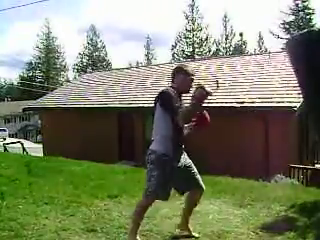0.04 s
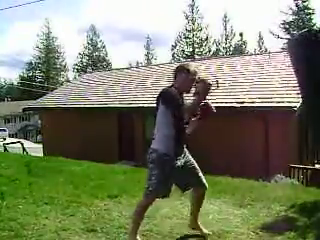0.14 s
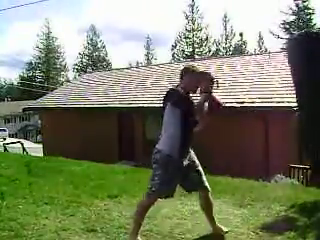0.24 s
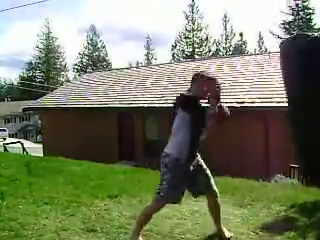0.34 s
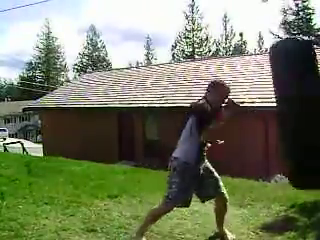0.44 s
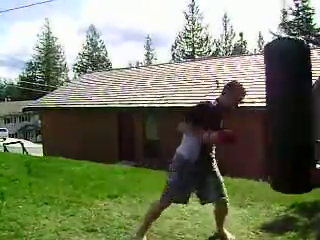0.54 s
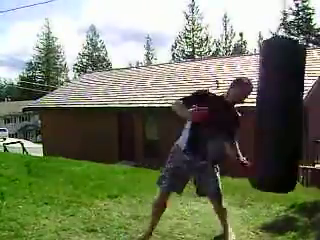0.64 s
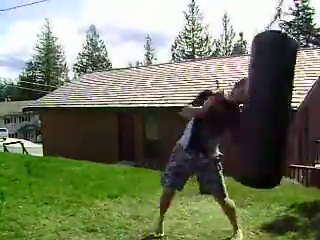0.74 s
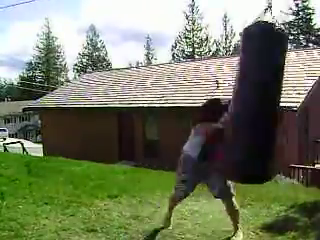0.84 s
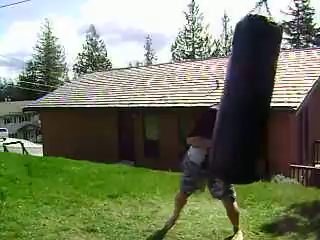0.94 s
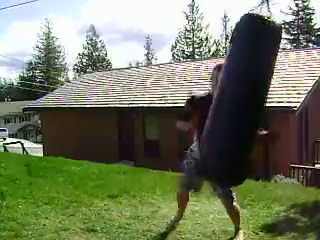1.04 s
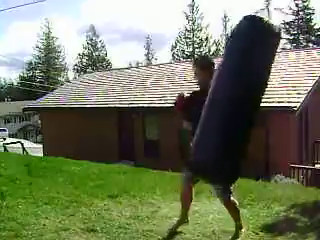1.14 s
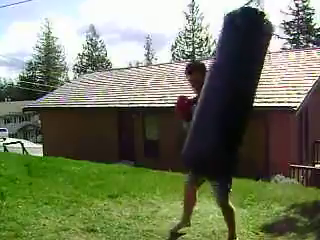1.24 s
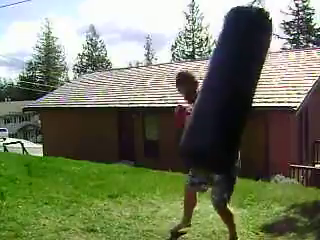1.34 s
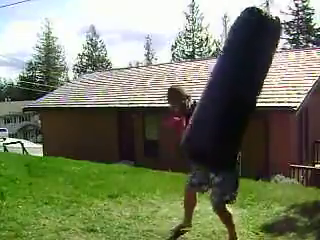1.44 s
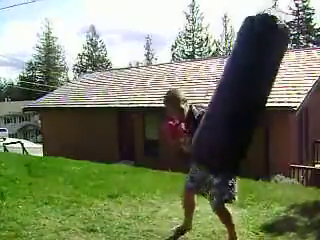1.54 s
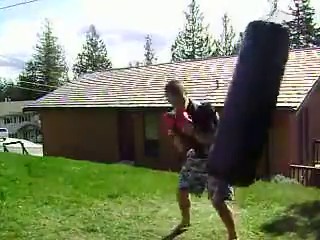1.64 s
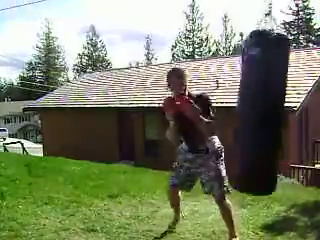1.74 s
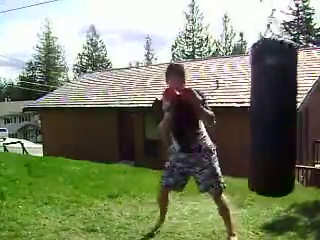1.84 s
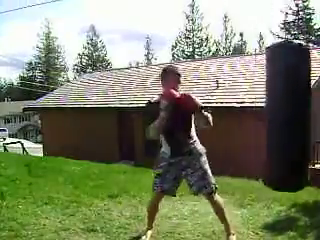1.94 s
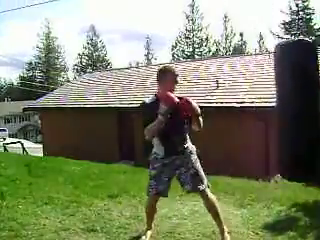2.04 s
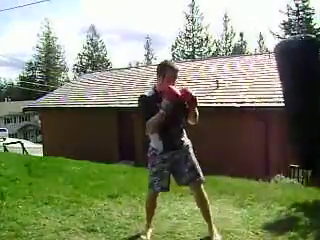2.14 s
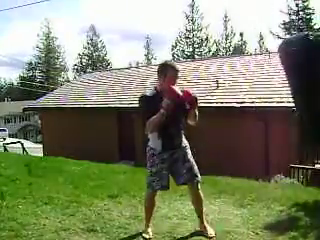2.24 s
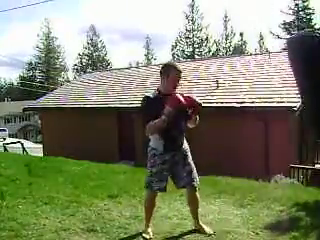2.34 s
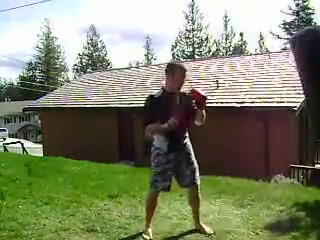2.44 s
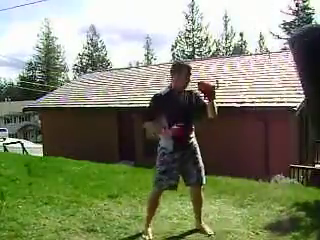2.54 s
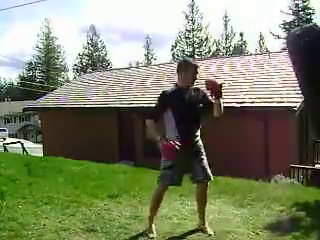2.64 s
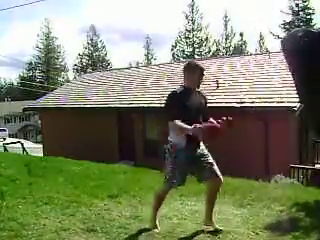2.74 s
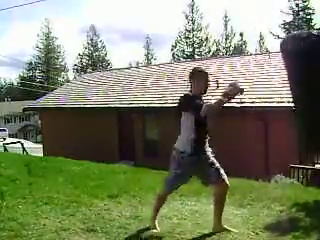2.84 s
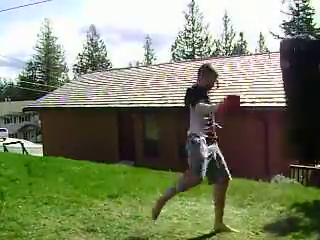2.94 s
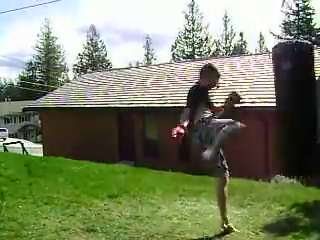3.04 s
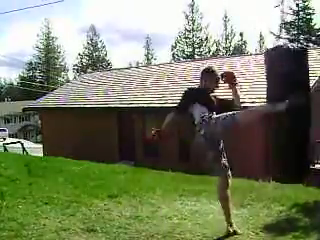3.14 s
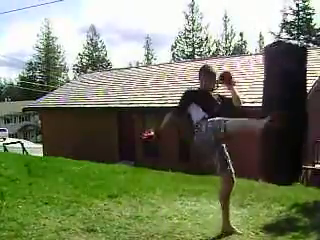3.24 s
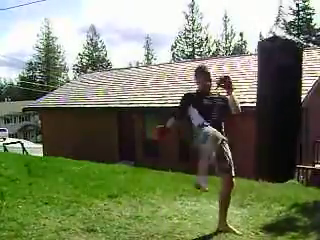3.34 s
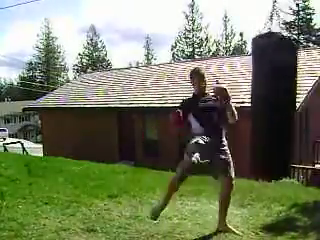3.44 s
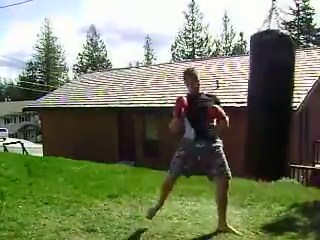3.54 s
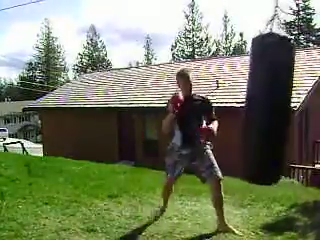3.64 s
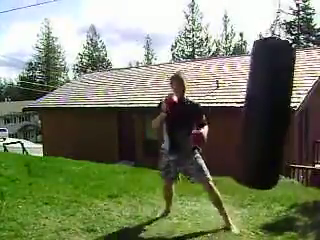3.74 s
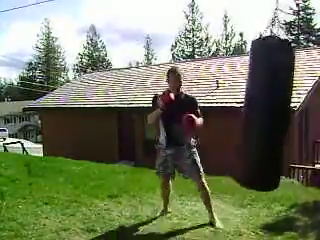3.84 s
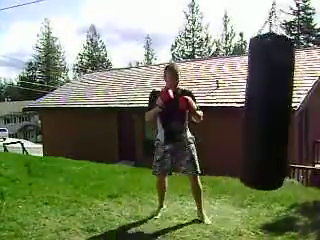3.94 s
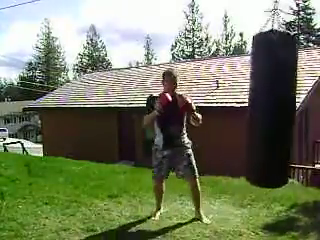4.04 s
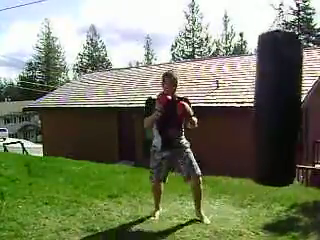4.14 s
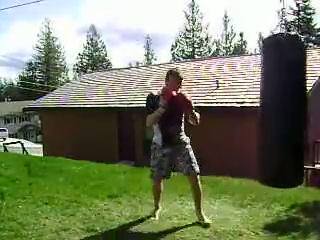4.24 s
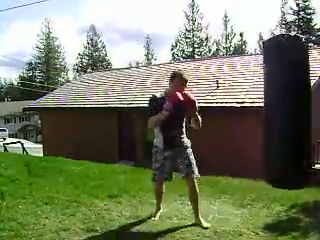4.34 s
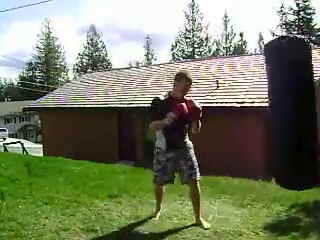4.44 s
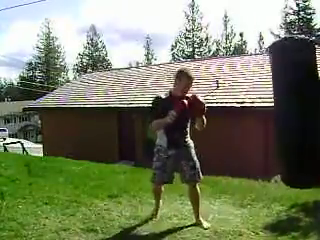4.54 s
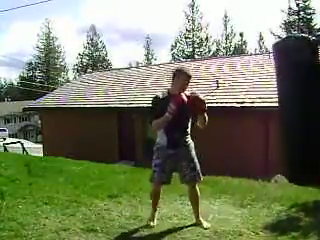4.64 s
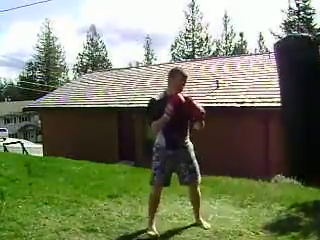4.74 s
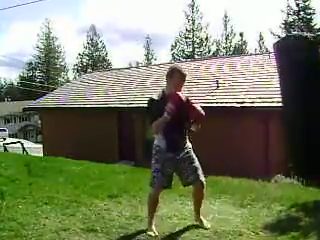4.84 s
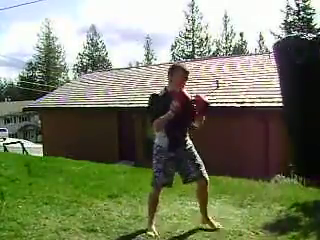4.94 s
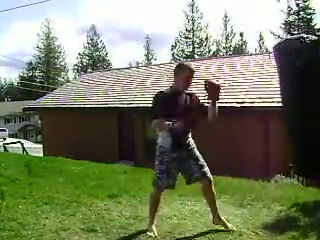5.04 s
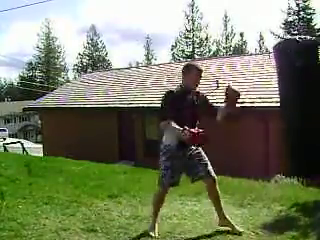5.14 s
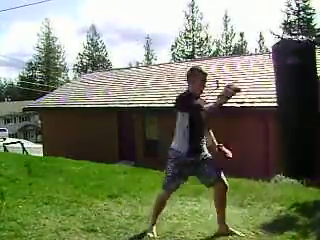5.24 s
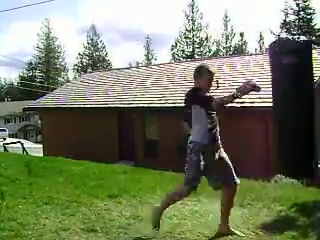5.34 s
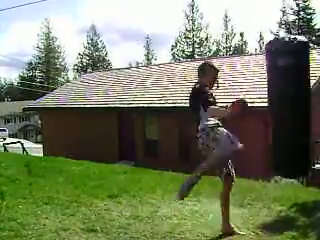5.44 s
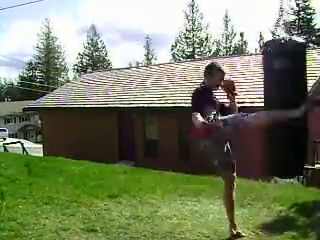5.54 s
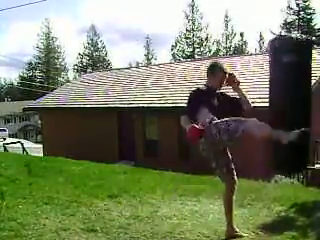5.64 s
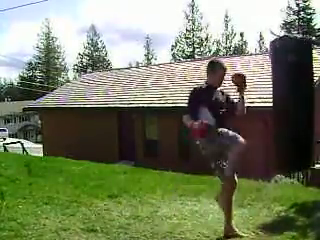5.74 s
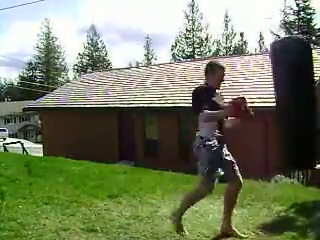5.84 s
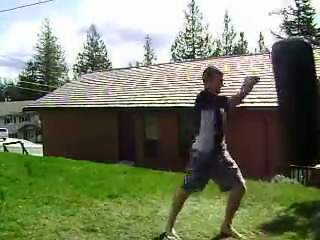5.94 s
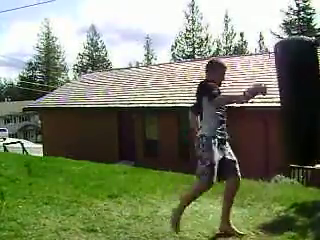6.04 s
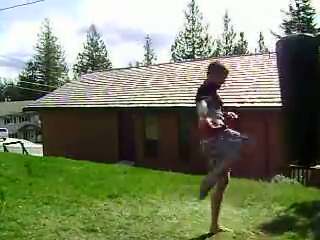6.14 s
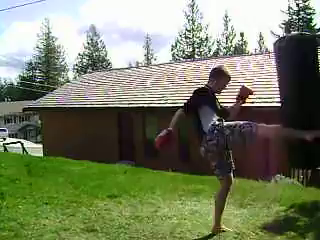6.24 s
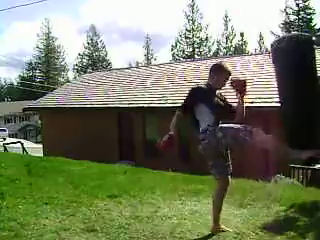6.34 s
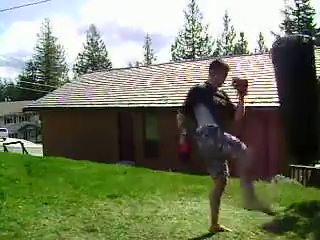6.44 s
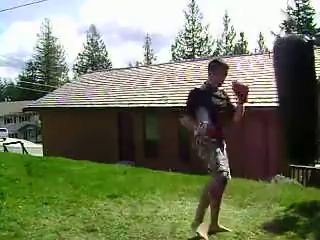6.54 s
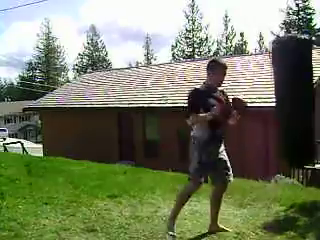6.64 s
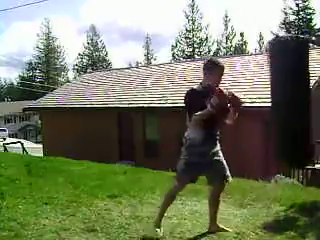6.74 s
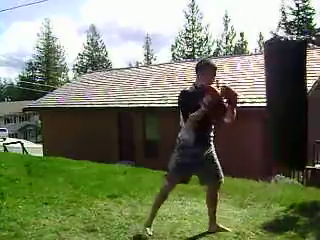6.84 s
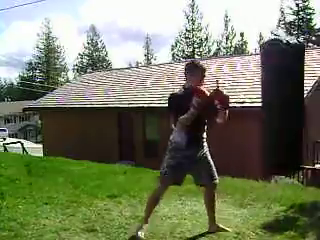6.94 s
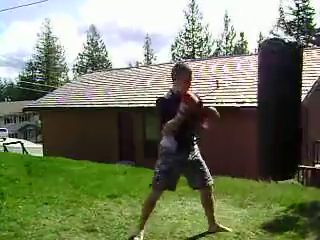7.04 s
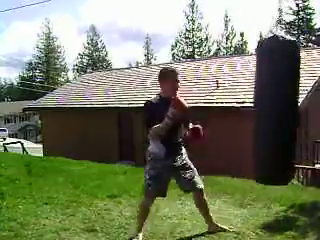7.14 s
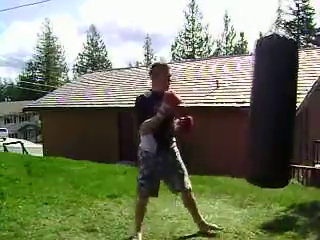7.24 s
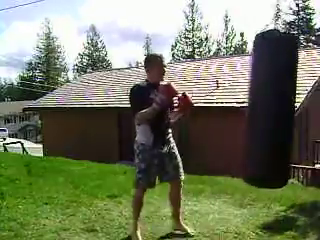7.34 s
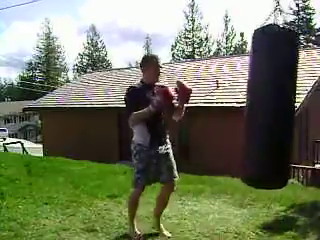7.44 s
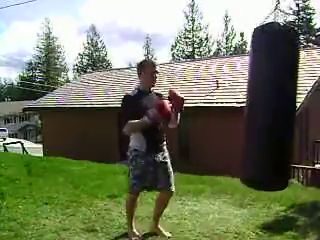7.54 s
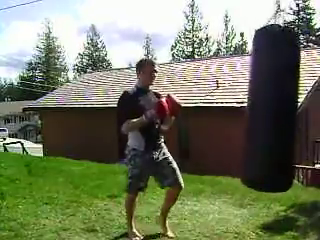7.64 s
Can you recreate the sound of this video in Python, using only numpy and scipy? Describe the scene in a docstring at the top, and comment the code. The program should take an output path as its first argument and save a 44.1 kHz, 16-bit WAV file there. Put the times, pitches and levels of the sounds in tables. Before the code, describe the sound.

A hanging punching bag takes sharp, thudding punches and kicks outdoors, its chain jingling and clanking while wind rumbles on the microphone.

```python
"""On a lawn, a heavy bag hanging from a chain takes two gloved punches and three kicks.
Each blow thuds in the filling and slaps the vinyl cover; the chain jingles after it, then clanks
and squeaks as the bag swings. Feet thump softly on the grass and traffic hums far away.
Wind buffets a small microphone, which overloads on the hard blows."""
import sys
import numpy as np
from scipy import signal
from scipy.fft import rfft, irfft
from scipy.io import wavfile

SR = 44100
rng = np.random.default_rng(int(sys.argv[2]) if len(sys.argv) > 2 else 0)


def log_audio(samples):
    """Write samples as a 16-bit WAV file to the path given in sys.argv[1]."""
    # one column per channel
    frames = np.atleast_2d(samples).T
    # limit to full scale, then quantise
    limited = np.clip(frames, -1, 1)
    pcm = np.round(limited * 32767).astype(np.int16)
    wavfile.write(sys.argv[1], SR, pcm)


N = 339992
TIME = np.arange(N) / SR

# wind strength at the microphone: time_s, rumble_db, flutter_db
GUSTS = [(0.0, -49, -40.5), (0.28, -40.5, -50.5), (0.5, -46, -41), (0.9, -35.5, -37.5), (1.36, -36, -34),
         (1.5, -42.5, -45), (1.6, -29.5, -34), (1.76, -38, -52), (1.86, -33, -38), (2.48, -37.5, -41),
         (2.62, -32.0, -37.5), (3.04, -31, -36), (3.12, -44, -46), (3.26, -39.5, -35), (3.76, -42.5, -40),
         (3.86, -33, -28.5), (4.08, -32, -28), (4.62, -34, -38.5), (4.76, -42, -42.5), (4.92, -37.5, -44),
         (5.12, -50.5, -48.5), (5.46, -37.5, -46.5), (5.72, -35.5, -31.5), (6.52, -33.5, -32.5),
         (6.74, -38.5, -43), (7.36, -39.5, -43.5), (7.46, -47.5, -42), (7.7, -48.5, -44)]


def from_db(db):
    """Turn decibels into a number to multiply by."""
    return 10 ** (np.asarray(db) / 20)


def unit_power(x):
    """Scale a signal to an average power of 1."""
    return x / np.sqrt(np.mean(x ** 2) + 1e-20)


def in_time(rows):
    """Join timed points with straight lines, one curve for each column."""
    time_s, *columns = np.transpose(rows)
    return [np.interp(TIME, time_s, column) for column in columns]


def keep_band(x, hz, side, order=2):
    """Keep the "low" or the "high" side of a frequency."""
    return signal.sosfilt(signal.butter(order, hz, side, fs=SR, output="sos"), x + 1e-18)


def coloured(x, spectrum):
    """Shape a sound's tone by rows of (pitch_hz, level_db), falling away past both ends; power 1."""
    hz, db = np.transpose(spectrum)
    grid_hz = np.fft.rfftfreq(N, 1 / SR) + 1
    ends = np.minimum(grid_hz / hz[0], 1) ** 2 * np.minimum(hz[-1] / grid_hz, 1) ** 2
    gain = from_db(np.interp(np.log(grid_hz), np.log(hz), db))
    return unit_power(irfft(rfft(x) * ends * gain, N))


def noise(spectrum):
    """Fresh noise shaped by rows of (pitch_hz, level_db)."""
    return coloured(rng.standard_normal(N), spectrum)


def drift(rate_hz):
    """A smooth random wander, about 1 in size."""
    grid_hz = np.fft.rfftfreq(N, 1 / SR)
    return unit_power(irfft(rfft(rng.standard_normal(N)) / (1 + (grid_hz / rate_hz) ** 2), N))


def grains(per_s, spread_db):
    """Tiny impacts of uneven size at random times; power 1."""
    sizes = from_db(spread_db * np.minimum(rng.exponential(1, N), 4)) * rng.choice([-1, 1], N)
    return unit_power(sizes * (rng.random(N) < per_s / SR))


def fade(age, fade_s):
    """Silent before age 0, then dying away from 1, by 60 dB every fade_s."""
    return (age >= 0) * from_db(-60 * np.maximum(age, 0) / fade_s)


def ring(x, hz, fade_s):
    """Each click in x starts a fading tone."""
    decay, turn = from_db(-60 / (fade_s * SR)), 2 * np.pi * hz / SR
    return signal.lfilter([0, np.sin(turn)], [1, -2 * decay * np.cos(turn), decay ** 2], x + 1e-18)


def resonance(x, hz, width_hz):
    """Let through only the sound near one pitch."""
    decay = np.exp(-np.pi * width_hz / SR)
    feedback = [1, -2 * decay * np.cos(2 * np.pi * hz / SR), decay ** 2]
    return signal.lfilter(np.array([1, 0, -1]) * (1 - decay ** 2) / 2, feedback, x + 1e-18)


def swells(rows):
    """A smooth rise and fall for each row of (peak_s, level_db, half_length_s)."""
    return sum(from_db(db) * np.exp(-((TIME - s) / half_s) ** 2 / 2) for s, db, half_s in rows)


def around(s):
    """The samples near an event and their age in seconds."""
    span = slice(max(int(s * SR) - SR // 10, 0), min(int(s * SR) + SR // 2, N))
    return span, TIME[span] - s


def wind():
    """Air swirls at the microphone: a lumpy rumble, with a higher flutter in the gusts."""
    # tone of each layer: pitch_hz, level_db
    rumble_tone = [(20, -3), (65, 0), (130, -1), (250, -5), (450, -15), (1000, -35.5)]
    flutter_tone = [(100, -10.5), (260, 5), (600, 7), (900, 1), (1400, -11), (2500, -27.5), (5500, -53.5)]
    rumble_db, flutter_db = in_time(GUSTS)
    swirl_db = 2 * drift(18)
    rumble = from_db(rumble_db + 0.5 + swirl_db + drift(21)) * noise(rumble_tone)
    flutter = from_db(flutter_db - 0.25 + swirl_db + 2.7 * drift(40)) * noise(flutter_tone)
    return rumble + flutter


def traffic():
    """Far-off cars blend into an almost steady hum."""
    # tone of the hum: pitch_hz, level_db
    hum_tone = [(200, -29.5), (450, -15.5), (700, 2), (920, 7), (1100, 3), (1350, -7.5), (1800, -4),
                (2900, -15), (5600, -32)]
    return from_db(-42 + 0.28 * drift(5.6)) * noise(hum_tone)


def crackle():
    """Dry ticks come in loose clumps and grow louder as the gusts stir things."""
    _, flutter_db = in_time(GUSTS)
    clicks = grains(per_s=350, spread_db=2) * from_db(1.6 * drift(15))
    burst = rng.standard_normal(SR // 20) * fade(TIME[:SR // 20], fade_s=0.011)
    ticks = signal.fftconvolve(clicks, burst)[:N]
    tick_tone = [(500, -0.5), (1100, 23), (2000, -3), (3000, -5), (5500, -3)]   # pitch_hz, level_db
    return from_db(-28 + 0.48 * flutter_db) * coloured(ticks, tick_tone)


def chain_motion():
    """How hard the chain moves: sudden jolts, gentle slides and a slight sway that never stops."""
    # the chain is thrown slack: start_s, level_db, hold_s
    jolts = [(0.541, -39.5, 0.3), (1.165, -34, 0.16), (3.175, -30, 0.13), (5.599, -30, 0.14),
             (6.321, -28, 0.089)]
    # links slide as the bag swings and twists: peak_s, level_db, half_length_s
    slides = [(0.5, -46, 0.046), (1.68, -44.5, 0.071), (2.08, -44.5, 0.069), (2.89, -43, 0.024),
              (3.635, -38.5, 0.037), (4.13, -43.5, 0.11), (4.62, -44, 0.065), (5.25, -45.5, 0.035),
              (6.17, -41.5, 0.14), (7.04, -44, 0.015), (7.597, -43, 0.027)]
    jolting, rise_s = np.zeros(N), 0.0047
    for start_s, db, hold_s in jolts:
        age = TIME - start_s
        rise = np.clip(age / rise_s, 0, 1)
        jolting += from_db(db) * rise * fade(np.maximum(age - hold_s, 0), fade_s=0.59)
    sway = from_db(-53.5 + 2.5 * drift(24))
    return np.sqrt(jolting ** 2 + swells(slides) ** 2 + sway ** 2)


def link_bursts(motion):
    """Links collide in short bursts of loudness, which merge into an even rush when shaken hard."""
    hits = grains(per_s=58, spread_db=2)
    power = signal.fftconvolve(hits ** 2, fade(TIME[:SR // 5], fade_s=0.04) ** 2)[:N]
    merge_db = -34.5
    burst_share = 0.57 / (1 + (motion / from_db(merge_db)) ** 2)
    return np.sqrt(1 - burst_share + burst_share * np.abs(power) / power.mean())


def chain_jingle():
    """The shaken chain rattles densely, and its loose links ring briefly."""
    # tone of the rattle: pitch_hz, level_db
    rattle_tone = [(350, -15), (700, -20), (1050, 9.5), (1450, 5), (2000, 5), (3200, -0.5), (4700, 2.5),
                   (5600, -2.5)]
    # notes of the loose links: pitch_hz, width_hz, level_db
    link_notes = [(2630, 84, 0), (3500, 97, -0.5), (4370, 67, -20.5), (5010, 96, 4)]
    motion = chain_motion()
    rattle = link_bursts(motion) * coloured(grains(per_s=7600, spread_db=4.5), rattle_tone)
    links = sum(from_db(db + 8 * drift(24)) * resonance(grains(per_s=690, spread_db=-1.5), hz, width_hz)
                for hz, width_hz, db in link_notes)
    return motion * (from_db(3.5) * rattle + from_db(-7.5) * unit_power(links))


def chain_clanks():
    """A link slips with one sharp knock and chatters to rest; the load shifts the hook's ring each time."""
    # links and hook catch under load: start_s, level_db, treble_db, fade_s
    catches = [(0.201, -22.5, -15, 0.038), (0.443, -22.5, -13.5, 0.089), (0.539, -15, -14.5, 0.29),
               (1.2725, -5.5, -11.5, 0.015), (1.786, -9.5, -12, 0.0092), (1.794, -11.5, -14, 0.13),
               (1.836, -19, -6, 0.12), (3.505, -15.5, -14.5, 0.1), (4.023, -17, -14, 0.087),
               (4.333, -5.5, -14.5, .02), (4.340, -12, -11, 0.07), (4.528, -11, -13, .035),
               (4.538, -9, -10.5, 0.11), (4.646, -23, -9.5, 0.1), (4.754, -25, -12, 0.086),
               (4.832, -19.5, -15.5, 0.11), (5.075, -22, -13, 0.1), (6.118, -18.5, -16, 0.13),
               (6.148, -15, -11.5, 0.18), (6.565, -19.5, -13, 0.21), (6.594, -16, -10, 0.078),
               (7.271, -22, -11.5, .029), (7.312, -26.5, -15, 0.22), (7.573, -19, -16, 0.21)]
    # notes of the loaded hook and chain: pitch_hz, level_db, fade_s
    hook_notes = [(657, 2, 0.0092), (860, -0.5, 0.03), (1052, 3.5, 0.016), (1230, 4, 0.01),
                  (1504, 2, 0.012), (1760, -1.5, 0.012), (2180, -5, 0.012)]
    out, chatter = np.zeros(N), grains(per_s=1200, spread_db=1.5)
    slips_per_s = 3.8   # lighter catches at random times
    slips = [(s, -26, -12, 0.044) for s in TIME[:-1][rng.random(N - 1) < slips_per_s / SR]]
    for start_s, db, treble_db, fade_s in list(catches) + slips:
        span, age = around(start_s)
        force = 0.11 * chatter[span] * fade(age, fade_s)
        force[np.searchsorted(age, 0)] += 1   # the first knock
        hook = sum((-1) ** k * from_db(note_db) * ring(force, hz * rng.normal(1, 0.026), ring_s)
                   for k, (hz, note_db, ring_s) in enumerate(hook_notes))
        tick = keep_band(keep_band(force, 1900, "high"), 5000, "low")
        out[span] += from_db(db - 8.5) * hook + from_db(db + treble_db + 24.5) * tick
    return keep_band(out, 520, "high")   # small steel parts give off no bass


def footfalls():
    """Feet land on grass with dull, soft-edged thumps."""
    # steps: peak_s, level_db, half_length_s
    steps = [(0.257, -33.5, 0.0077), (0.869, -24.5, 0.0065), (1.382, -29.5, 0.018), (1.825, -24.5, 0.014),
             (2.486, -30, 0.0025), (2.623, -25, 0.012), (2.952, -23, 0.01), (3.948, -33.5, .012),
             (4.56, -28.5, 0.013), (5.955, -19, 0.013)]
    return swells(steps) * noise([(40, -10), (170, 9.5), (400, 2), (800, -6), (1600, -19.5)])


def puff(age):
    """Air squeezed out by a contact: a push, then a weaker suction."""
    half_width_s, suction = 0.00027, 0.65
    phase = age / half_width_s
    return -phase * np.exp((1 - phase ** 2) / 2) * np.where(age < 0, 1, suction)


def thud(age):
    """The packed filling rings briefly, a little differently each time."""
    # notes of the filling: pitch_hz, level_db, fade_s
    filling_notes = [(42.2, 1.5, 0.058), (75, -9, 0.12), (116, -12.5, 0.06), (278, -3, 0.03),
                     (368, -16.5, 0.036), (590, -13, 0.013)]
    return sum(from_db(db) * fade(age, fade_s) * -np.sin(2 * np.pi * hz * rng.normal(1, 0.045) * age)
               for hz, db, fade_s in filling_notes)


def slap(cover, age, hz, fade_s):
    """Air trapped against the cover gives each slap a pitch of its own."""
    return unit_power(cover + 1.5 * resonance(cover, hz, width_hz=0.7 * hz)) * fade(age, fade_s)


def bag_blows():
    """A blow puffs, thuds, booms and slaps; the cover folds with a second slap and the filling settles."""
    # gloves and shins meet the bag: start_s, puff_db, thud_db, boom_hz, boom_db,
    # slap_db, slap_hz, slap_fade_s, fold_delay_s, fold_db, fold_hz, fold_fade_s
    blows = [(0.7391, -1.5, -20.5, 548, -26, -18.5, 700, 0.1, .012, -16.5, 1480, .04),
             (1.1567, 2.5, -13.5, 244, -5, -5.5, 1960, 0.034, .0155, -5.5, 2120, .028),
             (3.1627, 9.5, -1.5, 313, -7, -1.5, 910, 0.14, .016, -11, 1600, 0.05),
             (5.5884, -10, -28, 352, -15, -12, 1080, 0.15, 0.0077, -6.5, 1030, .06),
             (5.669, -8, -17, 543, -11.5, -17, 500, 0.067, .012, -27.5, 900, .05),
             (6.3072, -3.5, -10, 387, -7, -3.5, 630, 0.08, 0.013, -7, 1980, 0.069)]
    # tone of the vinyl cover: pitch_hz, level_db
    cover_tone = [(40, -7.5), (180, -18.5), (400, -6), (850, 3), (1100, 2.5), (1300, -9), (1500, -3),
                  (1950, -4.5), (2900, -11), (5400, -14.5)]
    out, cover, crease = np.zeros(N), noise(cover_tone), noise(cover_tone)
    for (start_s, puff_db, thud_db, boom_hz, boom_db, slap_db, slap_hz, slap_fade_s,
         fold_delay_s, fold_db, fold_hz, fold_fade_s) in blows:
        span, age = around(start_s)
        boom = -np.sin(2 * np.pi * boom_hz * age) * fade(age, fade_s=0.031)   # the taut struck patch
        strike = from_db(puff_db) * puff(age) + from_db(thud_db) * thud(age) + from_db(boom_db) * boom
        strike += from_db(slap_db) * slap(cover[span], age, slap_hz, slap_fade_s)
        fold_age = age - fold_delay_s
        fold = from_db(3.5) * puff(fold_age) + from_db(-14) * thud(fold_age)
        fold += slap(crease[span], fold_age, fold_hz, fold_fade_s)
        settle = slap(crease[span], age - 0.02, hz=800, fade_s=0.26)
        settle = keep_band(settle, 1800, "low", order=1)   # the cover muffles the shifting filling
        out[span] += strike + from_db(fold_db) * fold + from_db(thud_db - 13.5) * settle
    return out


def yard(x):
    """Add a few dull echoes and a thin scatter of sound from roof and trees."""
    # echoes off the house and fences: delay_s, level_db
    bounces = [(.016, -15.5), (.034, -16.5), (.061, -18.5)]
    dull = keep_band(x, 4300, "low", order=1)
    echoes = sum(from_db(db) * np.interp(TIME - delay_s, TIME, dull, left=0) for delay_s, db in bounces)
    age = TIME[:SR]
    scatter = rng.standard_normal(SR) * fade(age, fade_s=0.58) * (1 - fade(age, fade_s=0.26))
    tail = signal.fftconvolve(dull, scatter / np.linalg.norm(scatter))[:N]
    return x + echoes + from_db(-21.5) * tail


def chain_squeaks():
    """Steel rubbing on steel makes a short, rough squeal on one wavering note."""
    # links rub together: peak_s, pitch_hz, level_db, half_length_s
    rubs = [(2.092, 1416, -38, 0.055), (2.216, 1760, -42.5, 0.045), (3.366, 3460, -33.5, 0.022),
            (3.399, 2750, -33, 0.022), (3.449, 2600, -42.5, 0.053), (5.692, 4650, -29.5, 0.02),
            (5.818, 4350, -32, 0.0079)]
    out, waver, friction = np.zeros(N), drift(150), drift(240)
    for peak_s, hz, db, half_s in rubs:
        span, age = around(peak_s)
        pitch_hz = hz * (1 + 0.0076 * waver[span])
        tone = np.sqrt(2) * np.sin(2 * np.pi * np.cumsum(pitch_hz) / SR)
        out[span] += from_db(db) * np.exp(-(age / half_s) ** 2 / 2) * friction[span] * tone
    return out


def scene():
    """Bag, chain and feet in the yard, over wind and far traffic, in one channel."""
    hum = traffic()
    chain = chain_clanks() + chain_squeaks() + chain_jingle()
    return (yard(bag_blows()) + chain + crackle() + footfalls() + wind() + hum)[None]


def record(dry):
    """The small microphone loses the high treble and overloads, flattening the loudest peaks."""
    mic_top_hz, ceiling, overload_top_hz = 5626, 0.72, 16400
    narrow = signal.sosfilt(signal.cheby1(12, 0.3, mic_top_hz, fs=SR, output="sos"), dry)
    flattened = np.clip(narrow, -ceiling, ceiling)
    return signal.sosfilt(signal.cheby2(12, 70, overload_top_hz, fs=SR, output="sos"), flattened)


dry = scene()
out = record(dry)
log_audio(out)
```